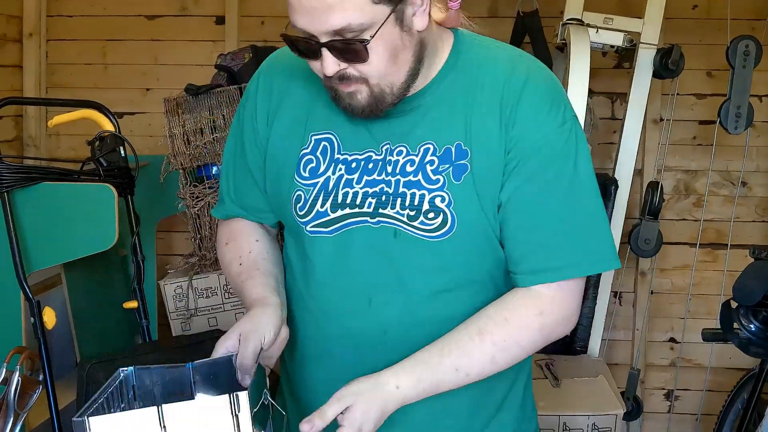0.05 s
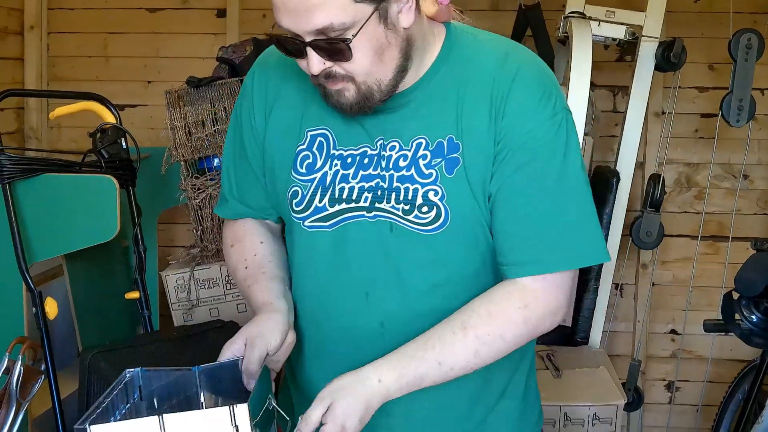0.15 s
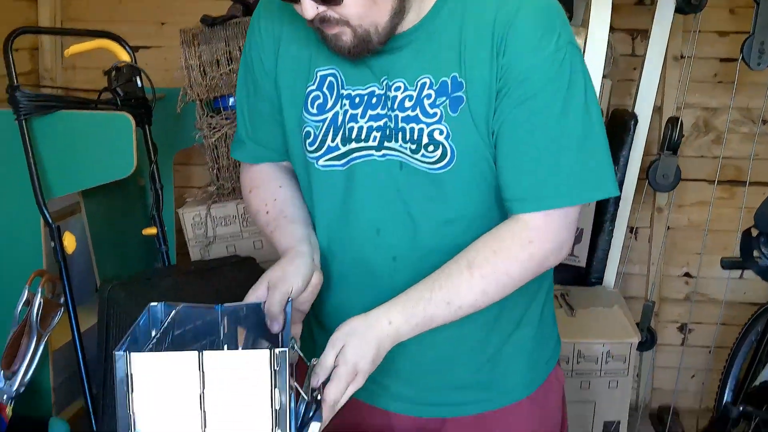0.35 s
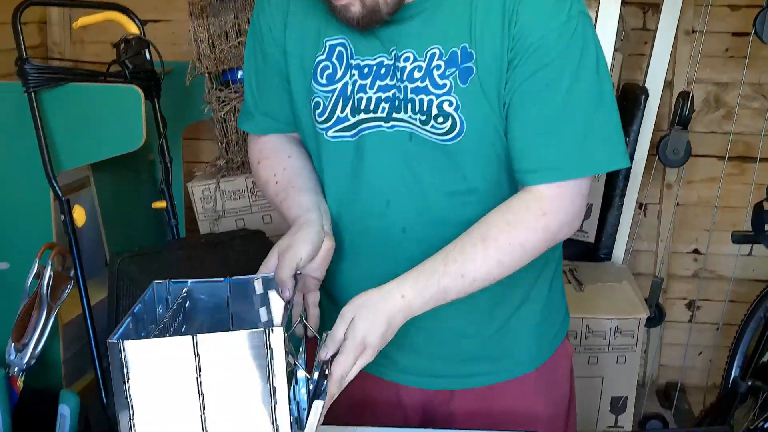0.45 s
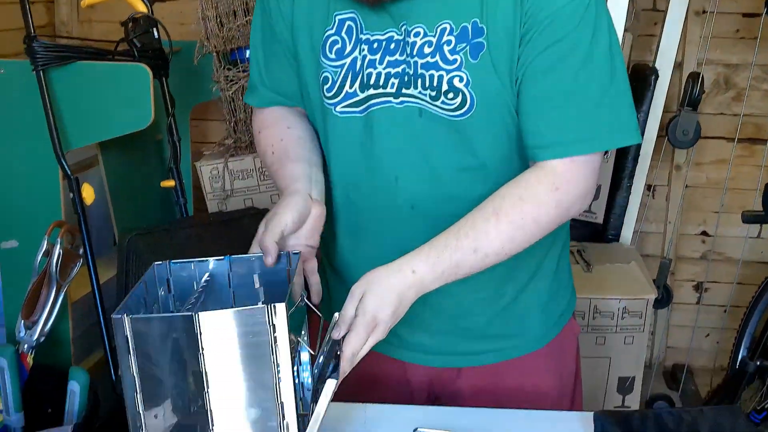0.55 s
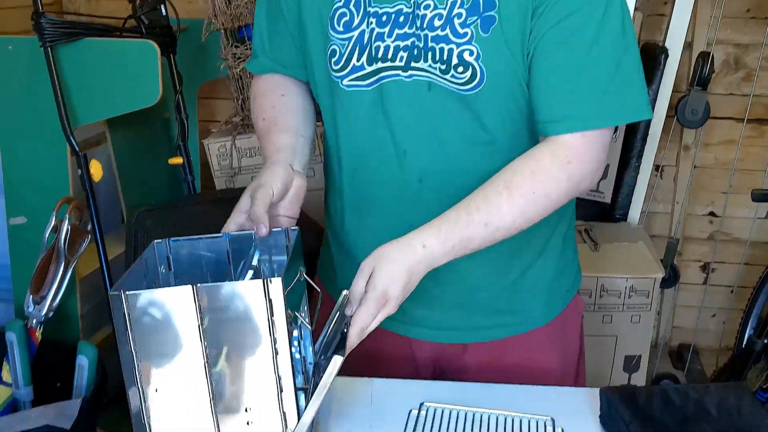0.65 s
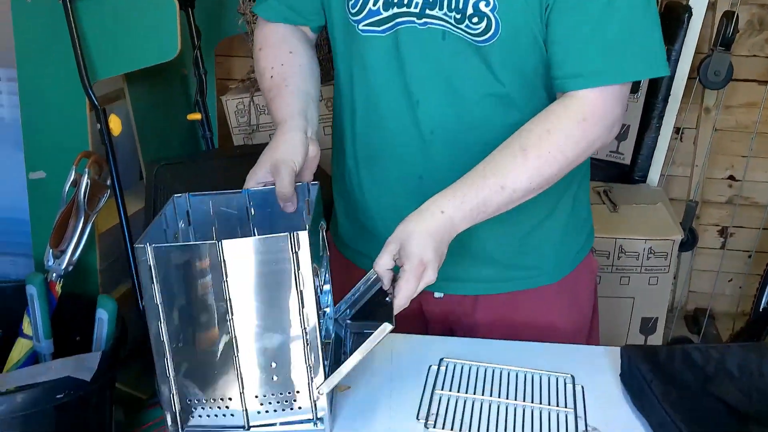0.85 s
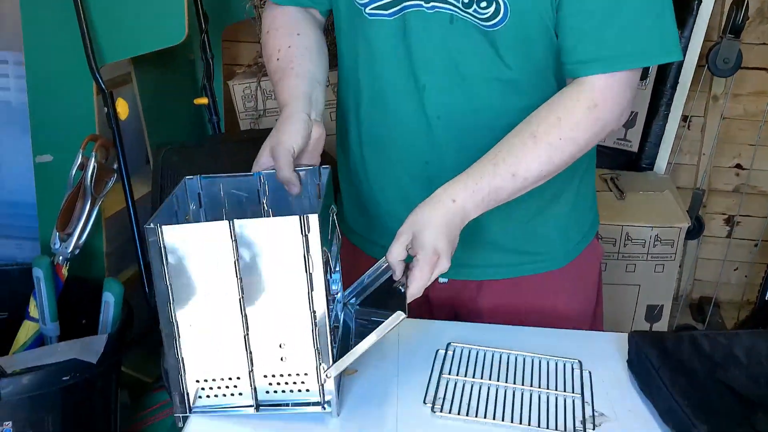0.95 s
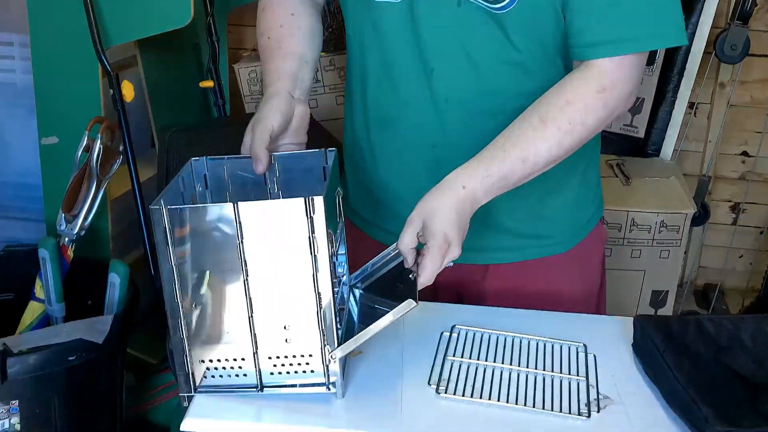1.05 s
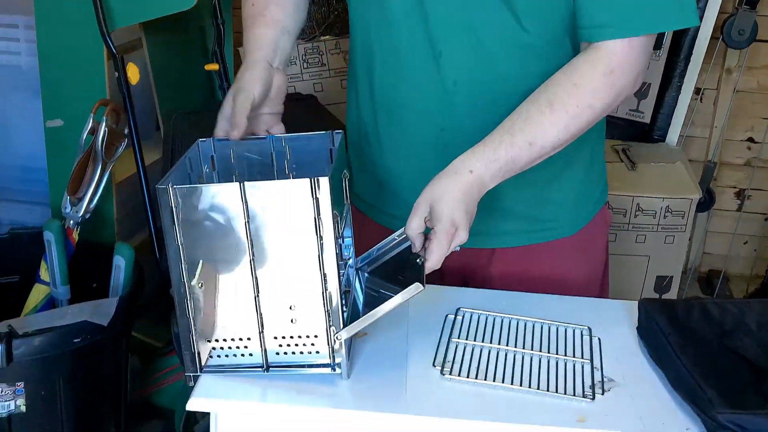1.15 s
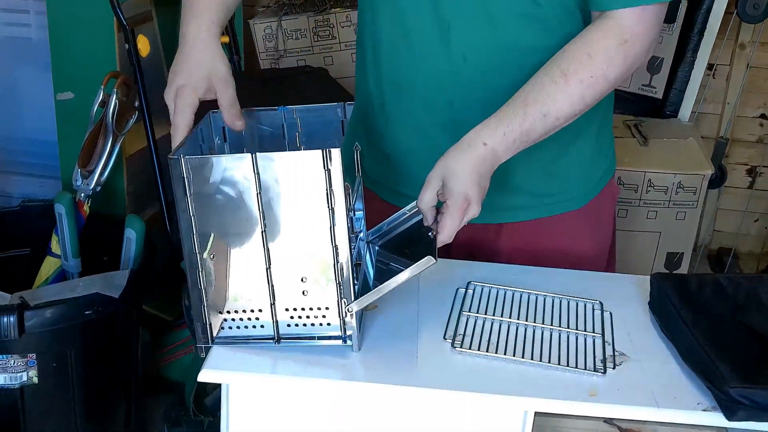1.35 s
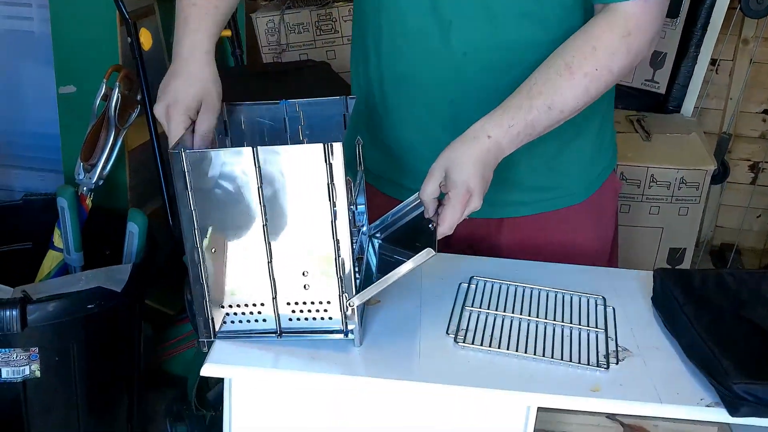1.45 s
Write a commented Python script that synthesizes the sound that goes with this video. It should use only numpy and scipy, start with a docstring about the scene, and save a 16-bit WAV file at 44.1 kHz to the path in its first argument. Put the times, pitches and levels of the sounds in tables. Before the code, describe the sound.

A folding metal oven is pulled open, its loose sheets scraping, rattling and bumping a table.

```python
"""The loose steel panels of a folding oven clink and scrape as it is pulled open and stood on a table.
They slide over each other in bouts of tiny slips, and every contact rings the same thin sheets.
The oven's walls flex and its feet bump the table in short thumps; the table top sways, and a fine tick
sounds as the oven settles. The wooden shed around it answers briefly, over faint steady air. Mono."""
import sys
import numpy as np
from scipy import signal
from scipy.fft import rfft, irfft, next_fast_len
from scipy.io import wavfile

SR = 44100
rng = np.random.default_rng(int(sys.argv[2]) if len(sys.argv) > 2 else 0)


def generate_wav(signal):
    """Clip the signal to [-1, 1] and save it as 16-bit WAV at the path in sys.argv[1]."""
    frames = np.transpose(np.atleast_2d(signal))
    scaled = np.clip(frames, -1, 1) * 32767
    pcm = np.round(scaled).astype(np.int16)
    wavfile.write(sys.argv[1], SR, pcm)


N = 66150
RING = np.arange(SR // 2) / SR  # time axis of one event [s]


def amp(db):
    """Decibels to gain."""
    return 10 ** (np.asarray(db) / 20)


def unit_energy(x):
    """Scale x to an energy of one."""
    return x / np.sqrt(np.sum(x ** 2) + 1e-20)


def along(curve, hz):
    """Read a (frequency [Hz], value) curve on a log frequency axis."""
    freqs, values = np.transpose(curve)
    return np.interp(np.log(hz + 1), np.log(freqs + 1), values)


def coloured(x, eq):
    """Minimum-phase EQ along a (frequency [Hz], gain [dB]) curve."""
    m = 2 * next_fast_len(len(x))
    gain = amp(along(eq, np.fft.rfftfreq(m, 1 / SR)))
    cepstrum = irfft(np.log(gain), m)
    cepstrum[1:m // 2] *= 2
    cepstrum[m // 2 + 1:] = 0
    return irfft(rfft(x, m) * np.exp(rfft(cepstrum)), m)[:len(x)]


def dying(x, t60s):
    """Let each frequency of x die at its own speed; the result has unit energy."""
    hz, t, spectrum = signal.stft(x, SR, nperseg=256)
    decay = amp(-60 * t / along(t60s, hz)[:, None])
    return unit_energy(signal.istft(spectrum * decay, SR)[1][..., :x.shape[-1]])


def fade(t60):
    """Exponential decay, 60 dB down after t60 seconds."""
    return np.exp(-np.log(1000) * RING / t60)


def partial(hz):
    """A sine with a random phase."""
    return np.sin(2 * np.pi * (hz * RING + rng.random()))


def add(track, start_s, x):
    """Mix x into the track."""
    part = track[max(round(start_s * SR), 0):][:len(x)]
    part += x[:len(part)]


def shed_air(rms_db=-52):
    """The shed's faint, steady room tone."""
    # rumble with a little hiss: (frequency [Hz], gain [dB])
    air_eq = [(15, -27), (25, -10), (69, -11.5), (139, -19.5), (293, -22.5), (1180, -28), (1760, -35),
              (5280, -43), (15000, -41.5)]
    return amp(rms_db) * np.sqrt(N) * unit_energy(coloured(rng.standard_normal(N), air_eq))


def shed_tails(shape, predelay_s=0.0054):
    """Diffuse reflections off the wooden walls."""
    # reverb decay: (frequency [Hz], T60 [s])
    shed_t60 = [(100, 0.86), (400, 0.35), (2000, 0.56), (8000, 0.51), (15000, 0.36)]
    onset = np.clip(RING / predelay_s - 1, 0, 1)
    return dying(rng.standard_normal(shape) * onset, shed_t60)


def table_sway(t60=0.64, rise_s=0.008):
    """The table's two lowest modes swell and die under the shifting load."""
    # shifts of weight: (time [s], level [dB])
    sways = [(0.235, -41), (0.652, -45.5), (0.791, -45), (1.315, -48.5)]
    # table top modes: (frequency [Hz], gain [dB])
    modes = [(62, -3.5), (98, 2)]
    out = np.zeros(N)
    envelope = fade(t60) * (1 - np.exp(-RING / rise_s))
    for start, db in sways:
        swing = sum(amp(gain) * partial(hz) for hz, gain in modes)
        add(out, start, amp(db) * swing * envelope)
    return out


def settling_tick(start_s=1.328, db=-43, ring_t60=0.29, snap_t60=0.044):
    """A tiny last contact rings only the highest modes."""
    # narrow band of sizzle: (frequency [Hz], gain [dB])
    tick_eq = [(6500, -27.5), (8200, -0.5), (9200, 2), (12000, -5.5), (15000, -13)]
    out = np.zeros(N)
    ring = rng.standard_normal(len(RING)) * (fade(ring_t60) + fade(snap_t60))
    add(out, start_s, amp(db) * coloured(ring, tick_eq))
    return out


def wall_thumps(rise_s=0.0012, reverb_db=-5):
    """Damped swings of a thin oven wall, prolonged by the shed."""
    # walls flexing or banging, feet bumping the table: (time [s], level [dB], pitch [Hz], T60 [s])
    thumps = [(0.231, -23, 235, 0.074), (0.366, -8, 900, 0.012), (0.370, -7.5, 608, 0.016),
              (0.379, -14.5, 846, 0.029), (0.373, -18.5, 270, 0.06), (0.522, -8.5, 280, 0.025),
              (0.546, -20.5, 254, 0.085), (0.662, -8, 306, 0.025), (0.712, -14.5, 1207, 0.093),
              (0.748, -12, 1150, 0.028), (1.046, -30, 243, 0.07), (1.130, -27, 814, 0.015),
              (1.176, -28.5, 742, 0.028), (1.310, -36, 239, 0.035), (1.344, -30.5, 995, 0.016)]
    # a thin wall radiates little deep bass: (frequency [Hz], gain [dB])
    wall_eq = [(110, -10), (240, 2.5)]
    out = np.zeros(N)
    for start, db, hz, t60 in thumps:
        swing = np.sin(2 * np.pi * hz * RING) * fade(t60) * (1 - np.exp(-RING / rise_s))
        reverb = signal.fftconvolve(swing, shed_tails(len(RING)))[:len(RING)]
        add(out, start, amp(db) * (swing + amp(reverb_db) * reverb))
    return coloured(out, wall_eq)


def contact_points(count=24, crack_db=-5, crack_t60=0.0087, reverb_db=-6.5):
    """Spectra of a tap at different spots on the sheets: a crack, dense modes and the shed's answer."""
    # decay of the dense modes: (frequency [Hz], T60 [s])
    sheet_t60 = [(250, 0.21), (1500, 0.2), (6000, 0.19), (15000, 0.14)]
    shape = (count, len(RING))
    dense = dying(rng.standard_normal(shape), sheet_t60)
    crack = amp(crack_db) * unit_energy(fade(crack_t60) * rng.standard_normal(shape))
    reverb = amp(reverb_db) * shed_tails(shape)
    return rfft(np.sqrt(count) * (dense + crack + reverb), SR)


def ring_sheets(points, force, bass_db, treble_db, count):
    """A force is shared among a few contact points, each ringing the sheets in its own way."""
    touched = points[rng.permutation(len(points))[:count]]
    shares = force * (rng.integers(count, size=len(force)) == np.arange(count)[:, None])
    ring = irfft(np.sum(rfft(shares, SR) * touched, axis=0), SR)[:len(RING)]
    return coloured(ring, [(286, bass_db), (900, 0), (2310, 0), (8500, treble_db)])


def oven_body(contacts, t60=0.21):
    """The panels' strongest modes ring out of the broad colour of steel."""
    # panel modes: (frequency [Hz], gain [dB])
    panel_modes = [(248, 7), (312, -1), (599, 4), (710, 3), (824, -2), (885, -5), (940, -1), (1149, 2),
                   (1207, 0.5), (1232, -3.5), (1518, -4), (1668, -2), (1955, -1), (3110, -8)]
    # tone of steel on steel: (frequency [Hz], gain [dB])
    steel_eq = [(40, -21), (125, -12), (180, 0), (250, 4.5), (340, 3.5), (470, 1), (750, 3.5), (1300, 0.5),
                (2500, -2), (5000, -4), (10500, -4.5), (15500, -12.5)]
    decay = fade(t60)
    modes = sum(amp(db) * np.cos(2 * np.pi * hz * RING) for hz, db in panel_modes)
    resonance = signal.fftconvolve(contacts, modes * 2 * decay / decay.sum())[:N]
    return coloured(contacts + resonance, steel_eq)


def clinks(points, chatter_s=0.0073, sheet_db=28, wire_db=-17, wire_t60=0.26, wire_spread_db=2):
    """Light taps, each with a few milliseconds of chatter on the sheets and a thin ring of wire."""
    # edges and wire catches tapping: (time [s], relative level [dB], bass [dB], treble [dB])
    taps = [(0.000, -36.5, -12, 5), (0.109, -35.5, -5, 2), (0.188, -35.5, -7, 9.5), (0.974, -25.5, 2, 2.5),
            (1.112, -44, 3, 0), (1.233, -57.5, -18, 11.5)]
    # modes of the catches and frame: (frequency [Hz], gain [dB])
    wire_modes = [(385, -2), (2030, -1), (2480, -0.5), (3436, 2), (4686, 5), (5850, 0), (6090, 0),
                  (7165, -11), (9169, 1), (10123, -3), (10349, -2), (11647, 1)]
    # light taps hardly move the low modes: (frequency [Hz], gain [dB])
    tap_eq = [(500, -19), (1200, -7), (2500, 3.5), (6000, 4)]
    out = np.zeros(N)
    for start, db, bass_db, treble_db in taps:
        chatter = unit_energy(rng.standard_normal(len(RING)) * np.exp(-RING / chatter_s))
        wire = sum(amp(gain + wire_spread_db * rng.standard_normal()) * partial(hz)
                   for hz, gain in wire_modes)
        add(out, start, amp(db + sheet_db) * ring_sheets(points, chatter, bass_db, treble_db, count=3))
        add(out, start, amp(db + wire_db) * wire * fade(wire_t60))
    return coloured(out, tap_eq)


def scrapes(points, slips_per_s=1600, spread_db=4, edge_s=0.0017, trim_db=1):
    """Panel slides on panel in a dense, uneven train of slips that rings the sheets."""
    # bouts of sliding: (time [s], length [s], relative level [dB], bass [dB], treble [dB])
    bouts = [(0.225, 0.069, -22, 0.5, -0.5), (0.366, 0.071, -25.5, 3, 2), (0.483, 0.079, -27.5, -0.5, -3.5),
             (0.529, 0.028, -22.5, 1, 0.5), (0.585, 0.043, -21.5, -2, 3.5), (0.626, 0.082, -17, -7, -2.5),
             (0.709, 0.0079, -5.5, -13, -3), (0.718, 0.036, -12, -11, -3.5), (0.763, 0.082, -19, -4, -1),
             (0.827, 0.076, -22, -2, 5), (0.909, 0.0204, -22.5, -3, -9), (0.962, 0.0278, -26.5, 2.5, -9),
             (1.038, 0.02, -28.5, 3.5, 5.5), (1.126, 0.0205, -31.5, 5, -3), (1.161, 0.028, -39, 2, -2.5),
             (1.312, 0.044, -44, 1.5, -22)]
    out = np.zeros(N)
    for start, length, db, bass_db, treble_db in bouts:
        slips = (rng.random(len(RING)) < slips_per_s / SR) * rng.choice([-1, 1], len(RING))
        strength = amp(spread_db * np.clip(rng.standard_normal(len(RING)), -2, 2))
        stroke = np.clip(np.minimum(RING, length - RING) / edge_s, 0, 1)
        force = unit_energy(slips * strength * stroke) * np.sqrt(length * SR)
        add(out, start, amp(db + trim_db) * ring_sheets(points, force, bass_db, treble_db, count=4))
    return out


def scene():
    """Scrapes and clinks sound through one steel body; tick, thumps, table and room tone join them."""
    points = contact_points()
    steel = oven_body(scrapes(points) + clinks(points))
    mono = steel + settling_tick() + wall_thumps() + table_sway() + shed_air()
    return np.array([mono, mono])


def record(dry, top_hz=16050, dc_offset=0.0107):
    """A brick-wall low-pass and a small constant offset."""
    m = next_fast_len(N + SR // 2)
    passband = np.fft.rfftfreq(m, 1 / SR) < top_hz
    return irfft(rfft(dry, m) * passband, m)[:, :N] + dc_offset


dry = scene()
out = record(dry)
generate_wav(out)
```